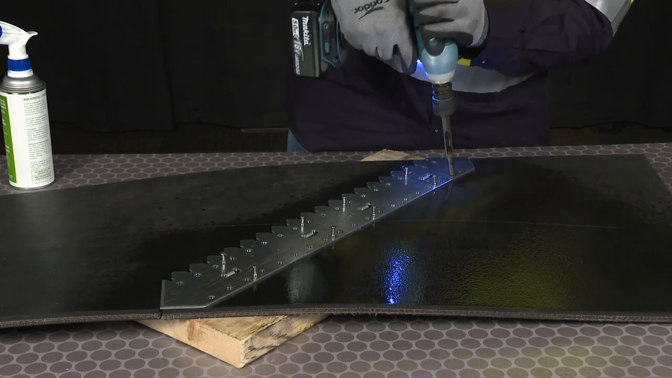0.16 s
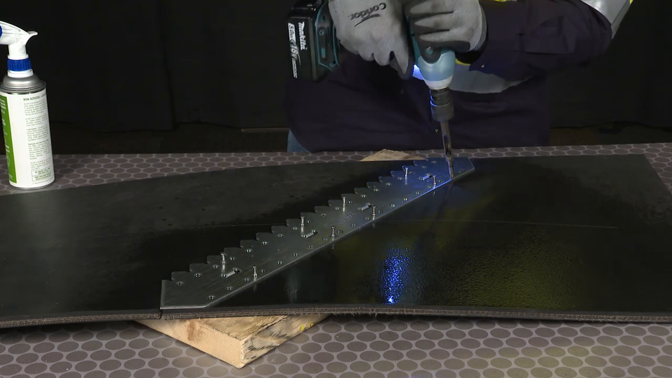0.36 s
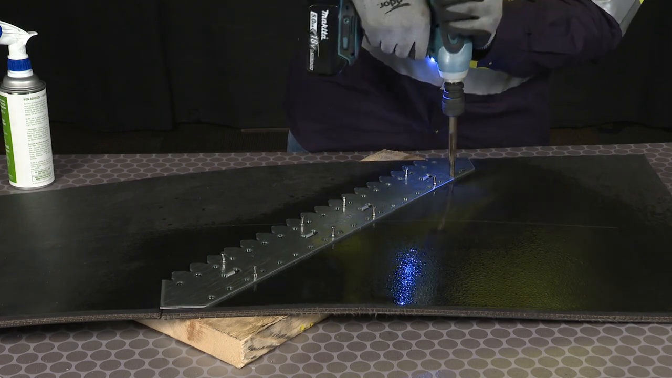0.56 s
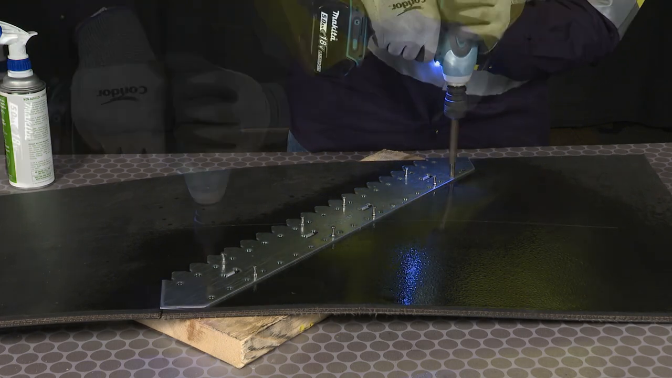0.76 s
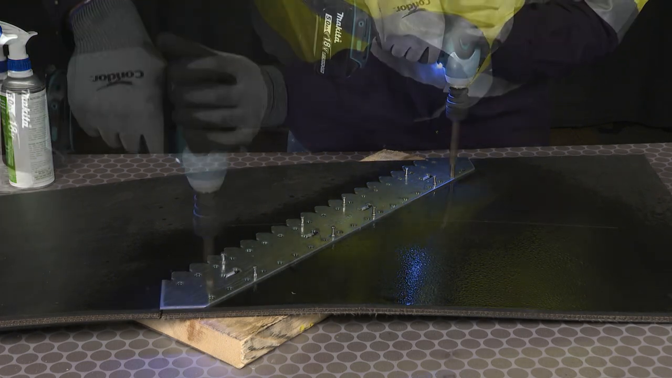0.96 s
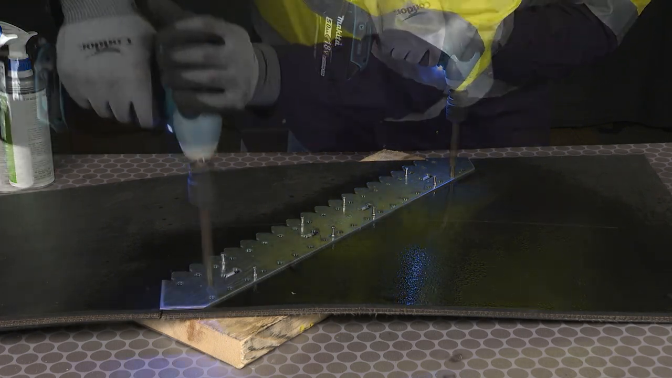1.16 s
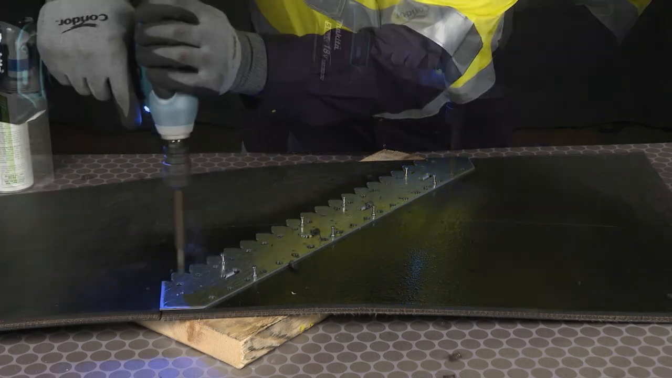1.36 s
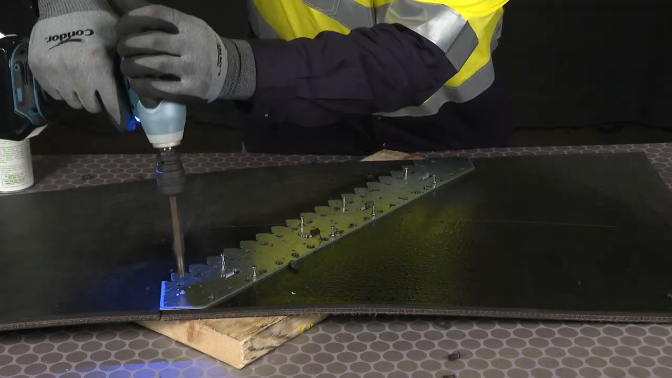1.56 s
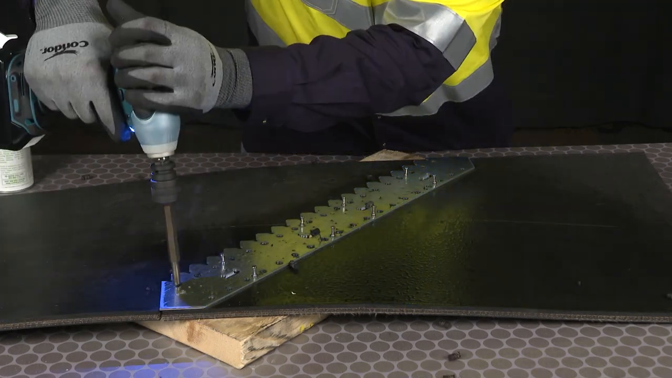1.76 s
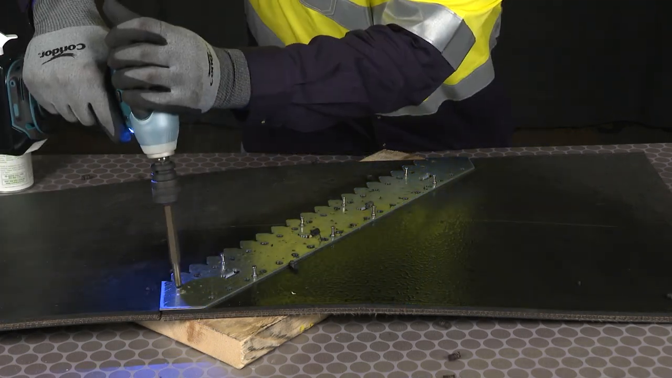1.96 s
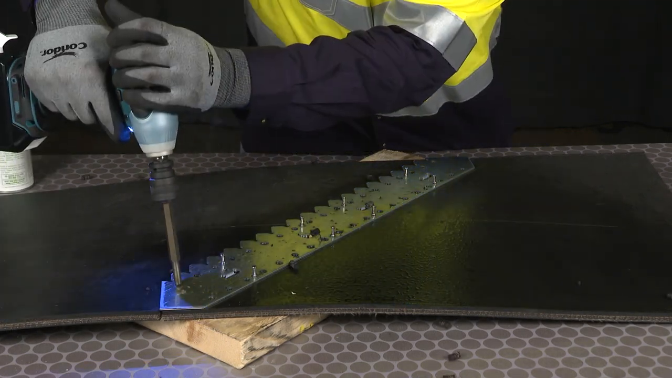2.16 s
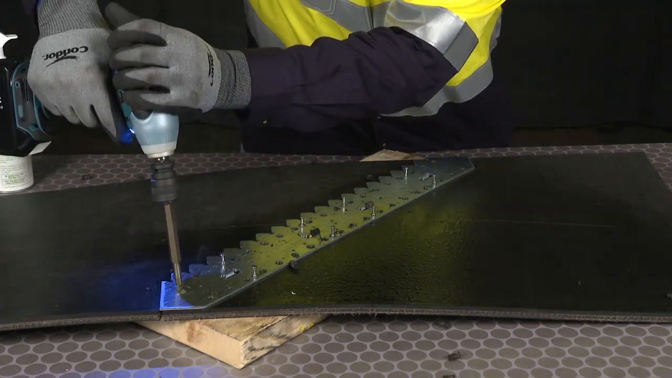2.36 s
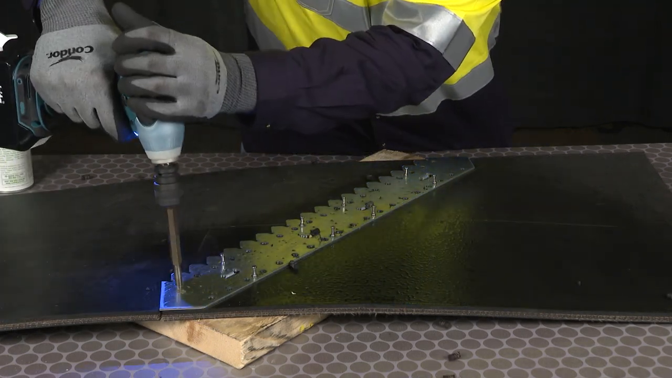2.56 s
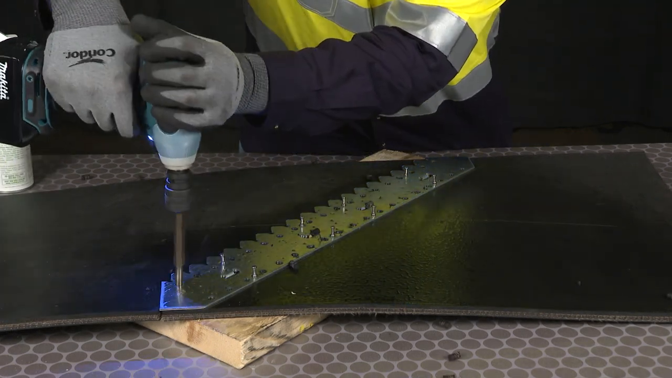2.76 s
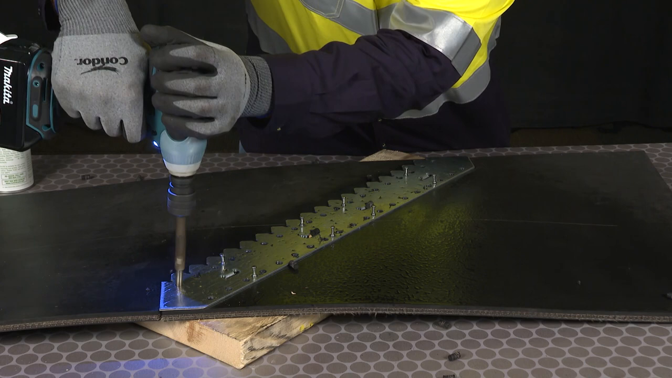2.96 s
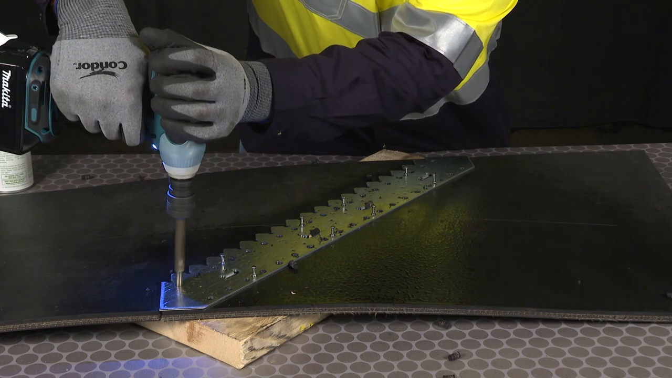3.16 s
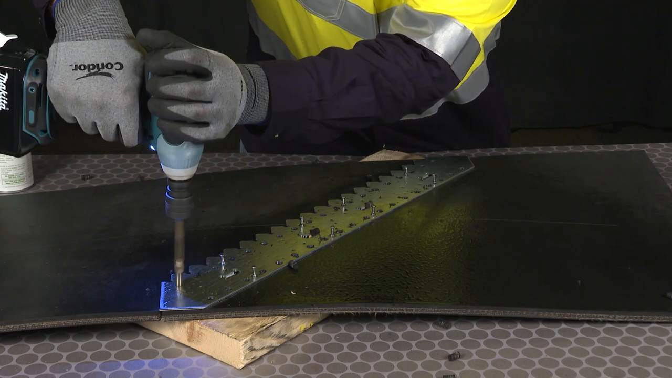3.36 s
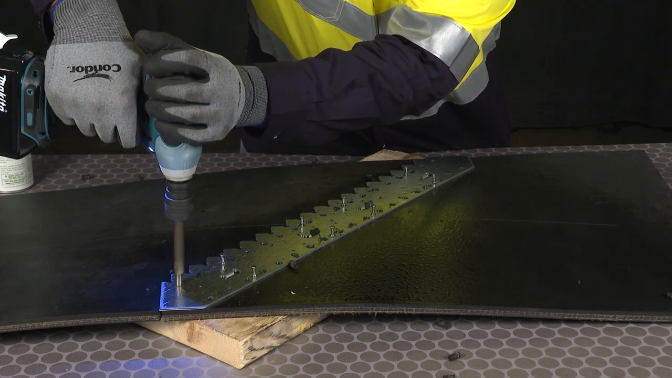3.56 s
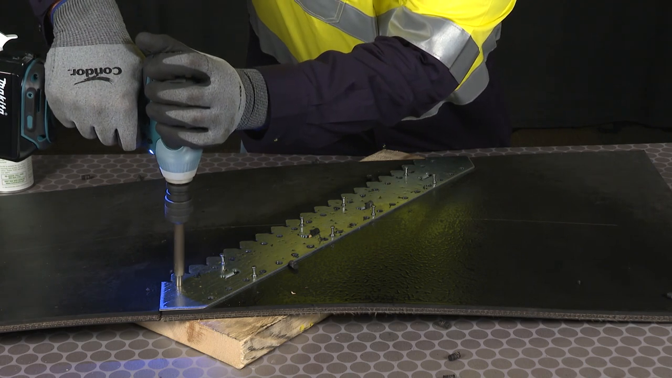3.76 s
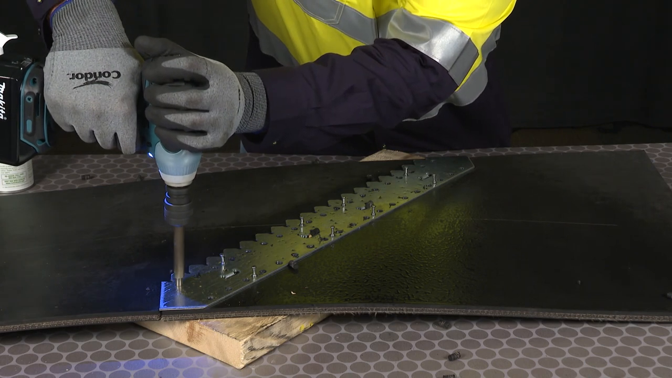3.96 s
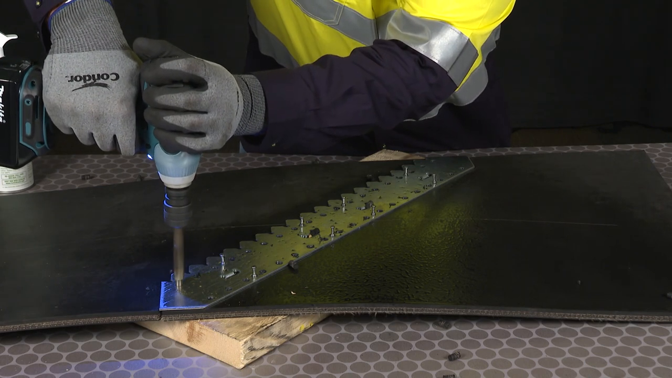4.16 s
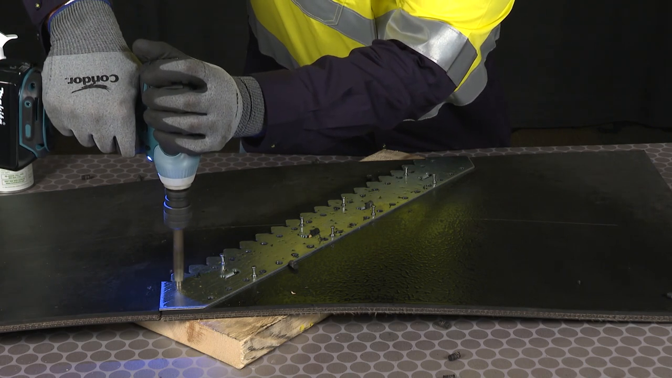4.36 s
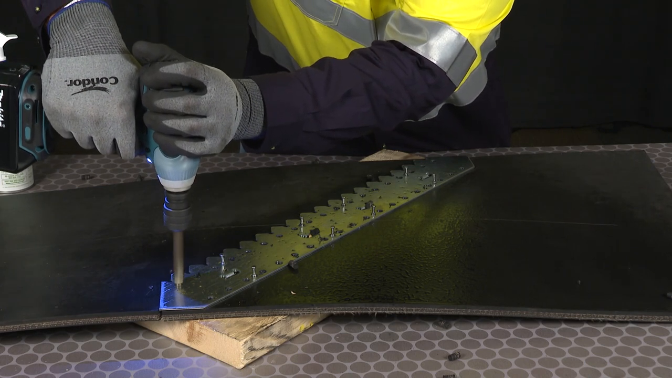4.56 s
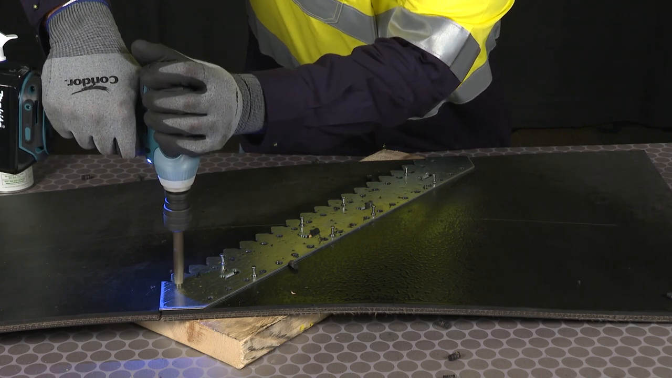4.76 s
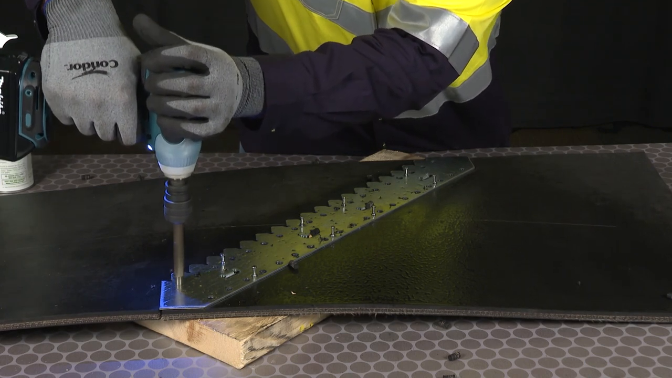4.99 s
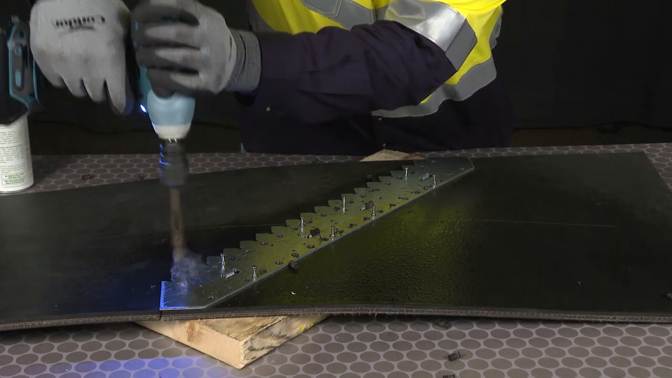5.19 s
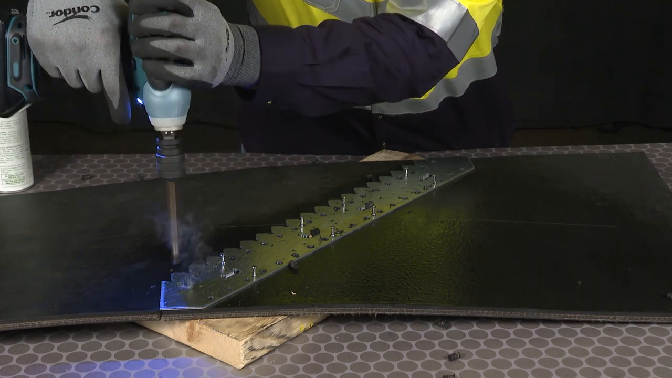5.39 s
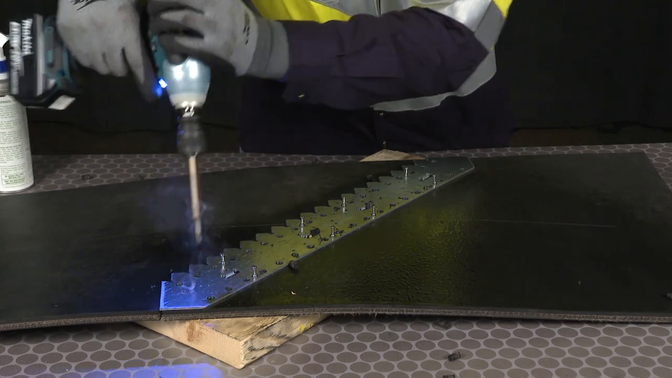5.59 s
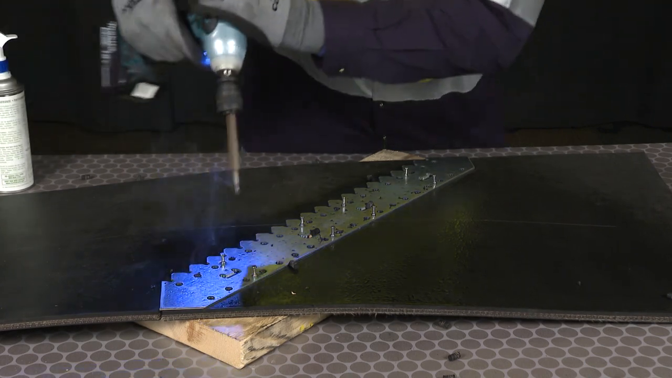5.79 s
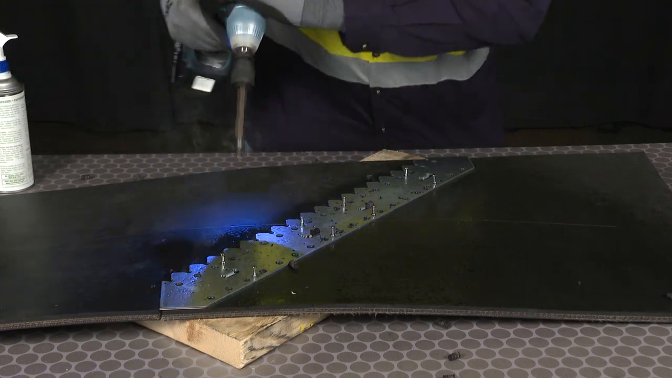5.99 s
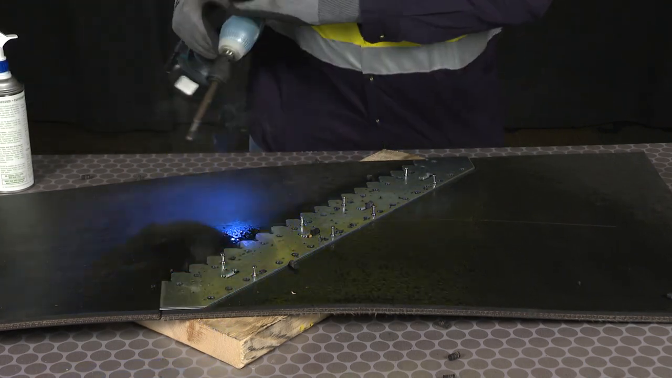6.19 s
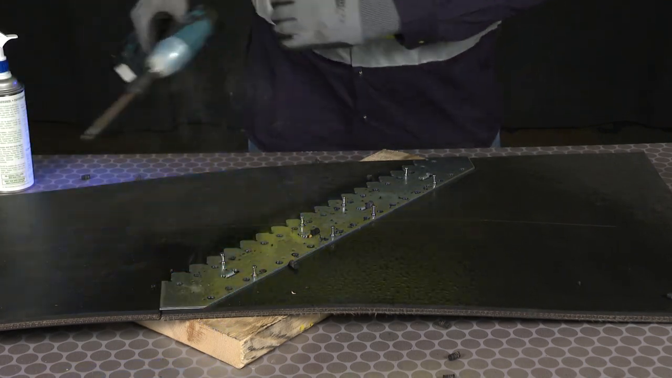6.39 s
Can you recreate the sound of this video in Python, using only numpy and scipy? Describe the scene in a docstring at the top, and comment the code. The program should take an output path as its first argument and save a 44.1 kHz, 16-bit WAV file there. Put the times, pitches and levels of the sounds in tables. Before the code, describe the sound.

A cordless impact wrench drives a punch through rubber twice, one short whirr and one longer labouring whine, with clacks, taps and ventilation rumble.

```python
"""Workshop bench: a cordless impact wrench spins a hollow punch through a rubber belt twice, without hammering.
The motor whines and blows air, its planetary gears sing and rattle, and the punch rubs over the same rubber
every turn: tones and rough tracks locked to the turning shafts, which slow under load.
Decaying noise and damped modes make the steel drive's clacks and the light taps before, between and in the cuts.
The belt thumps, braking squeaks, gloves and sleeves swish, and ventilation rumbles and hums throughout."""
import sys
import numpy as np
from scipy import signal
from scipy.fft import rfft, irfft
from scipy.io import wavfile
from scipy.ndimage import uniform_filter1d, map_coordinates

SR = 44100
rng = np.random.default_rng(int(sys.argv[2]) if len(sys.argv) > 2 else 0)


def master(y):
    """Save y as 16-bit WAV."""
    cut = np.clip(np.atleast_2d(y).T, -1, 1)
    pcm = np.round(cut * 32767)  # scale
    wavfile.write(sys.argv[1], SR, pcm.astype(np.int16))


N = 283765
T = np.arange(N) / SR


def undb(db):
    """Decibels to gain."""
    return 10 ** (np.asarray(db) / 20)


def unit(x):
    """Scale to rms 1."""
    return x / np.sqrt(np.mean(x ** 2))


def colour(x, points):
    """Filter by a (f/Hz, level/dB) spectrum, with the bass cut below its first point; rms 1."""
    hz, db = np.transpose(points)
    f = np.maximum(np.arange(N // 2 + 1) * SR / N, 1)
    bass_cut = np.minimum(f / hz[0], 1) ** 2
    gain = undb(np.interp(np.log(f), np.log(hz), db))
    return unit(irfft(rfft(x) * bass_cut * gain, N))


def noise(points):
    """Random noise with a given spectrum."""
    return colour(rng.standard_normal(N), points)


def walk(rate):
    """Smooth random wander, about rate changes a second; spread 1."""
    k = max(int(SR / rate), 1)
    steps = np.repeat(rng.standard_normal(N // k + 1), k)
    return unit(uniform_filter1d(uniform_filter1d(steps, k), k)[:N])


def fade(start, t60):
    """Exponential decay from a given moment."""
    return (T >= start) * np.exp(-np.log(1000) * np.maximum(T - start, 0) / t60)


def bump(peak, half_length):
    """A smooth swell and fall around one moment."""
    return np.exp(-((T - peak) / half_length) ** 2)


def beat(turns, place, width):
    """A smooth bump once a turn; place and width are in turns."""
    return np.exp(-(((turns - place + .5) % 1 - .5) / width) ** 2)


def track(turns, memory, bumps_db, size=2048, count=24):
    """A rough circular track read once a turn: it wears slowly and has a few high spots."""
    memory = np.clip(memory, 0, .98)
    spots = undb(bumps_db * signal.resample(rng.standard_normal(count), size))
    grain = rng.standard_normal((int(turns[-1]) + 2, size))
    # each turn remembers part of the one before
    surface = signal.lfilter([1], [1, -memory], grain, axis=0)
    return map_coordinates((surface * spots).ravel(), [turns * size], order=3)


def per_hole(first, second):
    """One value up to the second pull of the trigger and another from then on."""
    return np.where(T < HOLES[1][0], first, second)


def by_hole(first_db, second_db):
    """A gain for each hole, from decibels."""
    return per_hole(undb(first_db), undb(second_db))


# spectrum of the ventilation rumble (f/Hz, relative level/dB)
RUMBLE_SPECTRUM = [(20, -17), (50, -1), (113, -7), (142, -11), (198, -7), (230, -15), (400, -19),
                   (740, -26), (1030, -27.5), (1300, -34), (1900, -40), (4300, -44.5), (16000, -51.5)]
# steady hum in the shop (f/Hz, rms level/dB before it wavers)
HUM_TONES = [(57, -67.5), (118, -72), (199, -76.5), (1006, -84.5)]
RUMBLE_DB = -58


def shop():
    """Ventilation as low shaped noise, with a hum of sines wavering in level and phase."""
    hum = sum(undb(db + 2.3 * walk(45)) * np.sin(2 * np.pi * hz * T + 0.26 * walk(6.2))
              for hz, db in HUM_TONES)
    return undb(RUMBLE_DB) * noise(RUMBLE_SPECTRUM) + np.sqrt(2) * hum


def ringing(start, modes):
    """Damped modes set off at one moment, each slightly retuned at random."""
    t = T[:SR // 4]
    ring = 0
    for hz, t60, db in modes:
        detuned = hz * (1 + 0.013 * rng.standard_normal())
        ring = ring + undb(db) * np.exp(-np.log(1000) * t / t60) * np.sin(2 * np.pi * detuned * t)
    return np.pad(ring, (int(start * SR), N))[:N]


# spectrum of a dull knock (f/Hz, relative level/dB)
KNOCK_SPECTRUM = [(100, -36), (300, -4.5), (390, 4), (500, -0.5), (700, 1), (1300, -3), (2200, -13),
                  (4000, -28), (9000, -47.5), (16000, -50)]
# modes of the steel template on the belt (f/Hz, t60 t/s, relative level/dB)
TEMPLATE_MODES = [(637, 0.062, 0.5), (796, 0.16, -9.5), (888, .06, -6.5), (1250, 0.045, -10)]
# modes of the bench under the belt (f/Hz, t60 t/s, relative level/dB)
BENCH_MODES = [(370, 0.12, -18), (378.6, 0.13, 4), (474, .05, -13)]
# trigger, punch taps and catches
# (t/s, knock level/dB, tick level/dB, contact t/s, template ring level/dB, bench ring level/dB)
TAP_EVENTS = [(.078, -56, -88, .012, -53, -66), (.234, -52, -80, .008, -58, -58),
              (.2455, -43, -56, .0015, -37, -47), (.526, -57, -90, .004, -55, -62),
              (.598, -41, -53, .001, -52, -56), (1.792, -47, -72, .001, -54, -52),
              (1.812, -53, -47.5, .002, -63, -45), (2.088, -56, -75, .012, -62, -52),
              (2.235, -54, -82, .004, -53, -62), (2.252, -49, -61, .003, -45, -54),
              (2.423, -61, -73, .004, -66, -60), (2.527, -61, -80, .001, -64, -64),
              (2.668, -60, -86, .002, -58, -68), (2.817, -45, -54, .005, -50, -60),
              (2.873, -47, -70, .002, -34, -54), (3.036, -35, -54, .001, -37, -46),
              (3.378, -36, -54, .002, -44, -44)]
KNOCK_T60_S, TICK_T60_S = .065, .024


def handling():
    """Each contact presses in gradually: a dull noise knock, a short bright tick, ringing template and bench."""
    knock = noise(KNOCK_SPECTRUM)
    tick = noise([(1500, -16), (4500, 17.5), (8000, 12.0), (16000, -7.5)])
    taps = 0
    for s, knock_db, tick_db, contact, template_db, bench_db in TAP_EVENTS:
        press = np.clip((T - s) / contact, 0, 1)
        dull = undb(knock_db) * fade(s, KNOCK_T60_S) * knock
        bright = undb(tick_db) * fade(s, TICK_T60_S) * tick
        body = undb(template_db) * ringing(s, TEMPLATE_MODES) + undb(bench_db) * ringing(s, BENCH_MODES)
        taps = taps + press * (dull + bright + body)
    return taps


# the punch catches in the rubber and thumps the belt (peak t/s, half length t/s, f/Hz, level/dB)
BELT_THUMPS = [(0.31, 0.05, 170, -55), (0.968, 0.059, 62, -38), (1.097, 0.028, 180, -38.5),
               (3.16, .07, 64, -43.5), (3.395, 0.018, 150.4, -42)]


def thumps():
    """Short low swells of the belt flexing under the punch."""
    return sum(undb(db) * bump(s, length) * np.sin(2 * np.pi * hz * T + .5 * walk(40))
               for s, length, hz, db in BELT_THUMPS)


# grain of the motor tones
FLUTTER_DB, JITTER_RAD = 1.2, .1


def tone_at(turns, multiple):
    """A slightly grainy tone locked to the motor shaft."""
    return undb(FLUTTER_DB * walk(240)) * np.sin(2 * np.pi * multiple * turns + JITTER_RAD * walk(300))


# whine under load (multiple of motor speed, rms level/dB in the first hole, rms level/dB in the second)
CUTTING_WHINE = [(1, -62, -49.5), (3, -48, -54), (4, -60, -56), (10, -50, -54), (17, -62, -56),
                 (18, -55, -59), (19, -58, -59), (20, -55, -68), (25, -66, -70), (30, -68, -67),
                 (31, -70, -66), (40, -60, -68), (50, -61, -67), (60, -67, -67)]
# whine of the free-running motor (multiple of motor speed, rms level/dB)
FREE_RUNNING_WHINE = [(3, -52), (4, -54), (10, -52), (17, -52), (18, -58), (20, -60), (29, -64), (30, -62),
                      (39, -67), (40, -67), (50, -67)]
# spectrum of the fan air (f/Hz, relative level/dB)
AIR_SPECTRUM = [(300, -13.5), (900, 15), (2000, 1), (5000, 11.5), (5800, 11.5), (7000, 6), (8300, 5),
                (9300, 3.5), (10200, 6), (11800, 7.5), (12700, 0.5), (14500, 4.5), (16000, -4)]
# at full load the tones below this multiple fade by this much; the higher ones keep their level
BOG_ORDER, BOG_DB = 25, -15
# the whistle sings above this motor speed and fades over this range around it
WHISTLE_ORDER, WHISTLE_ABOVE_HZ, WHISTLE_FADE_HZ = 17, 262, 4
WHISTLE_FIRST_DB, WHISTLE_SECOND_DB = -62, -52.5  # rms


def motor(turns, hz, load, cutting, air):
    """Unbalance, magnet and fan-blade tones over rushing air; bogging down fades the low ones."""
    bog = undb(BOG_DB * load)
    whine = sum((bog if k < BOG_ORDER else 1) * by_hole(a, b) * undb(walk(25.07)) * tone_at(turns, k)
                for k, a, b in CUTTING_WHINE)
    free = sum(undb(db + 2 * walk(19)) * tone_at(turns, k) for k, db in FREE_RUNNING_WHINE)
    # tones fade steeply below the speed expected at this load
    pace = np.minimum(hz / np.interp(load, [0, 1], [268, 235]), 1) ** 7
    fast = (1 + np.tanh((hz - WHISTLE_ABOVE_HZ) / WHISTLE_FADE_HZ)) / 2
    whistle_level = fast * by_hole(WHISTLE_FIRST_DB, WHISTLE_SECOND_DB) * undb(walk(14))
    whistle = whistle_level * tone_at(turns, WHISTLE_ORDER)
    tones = cutting * (whine + whistle) + (1 - cutting) * free
    return np.sqrt(2) * pace * tones + undb(-1 * load) * air * noise(AIR_SPECTRUM)


def swell(turns, place, width, rest):
    """The leaning punch loads the gears once a turn, above a resting level; rms 1 over each turn."""
    power = rest ** 2 + 2 * rest * width * np.sqrt(np.pi) + width * np.sqrt(np.pi / 2)
    return (rest + beat(turns, place, width)) / np.sqrt(power)


# overtones of the tooth contact (multiple of mesh rate, relative level/dB)
TOOTH_OVERTONES = [(4, 2), (5, 0), (6, -5), (7, -6), (8, -7), (9, -11.5), (10, -12), (11, -12)]
# spectrum of the gear rattle (f/Hz, relative level/dB)
GEARBOX_SPECTRUM = [(700, 0), (1100, 5), (1650, -13.5), (2050, -7), (2450, -3), (2800, 2.5), (3300, 1),
                    (3800, -2.5), (4400, -1), (5100, -2.5), (6000, -12.5), (7200, -31.5), (10000, -63.5)]
# rough overtones of the mesh while the speed changes (multiple of mesh rate, level/dB at full surge)
WHOOP_OVERTONES = [(1, -31.5), (2, -45), (3, -48)]
SUN_TEETH, RING_TEETH = 7, 51
# once a turn the mesh tone swells, then its octave (place and width in turns)
MESH_PLACE, MESH_WIDTH, OCTAVE_PLACE, OCTAVE_WIDTH = .84, .27, .03, .17
# ragged skirt relative to the mesh tone; scraping of loaded teeth relative to the gear rattle
SKIRT_DB, SCRAPE_DB = -3.5, -10


def gears(turns, load, surge, tone, edge, rattle):
    """Planets roll over the ring teeth: a mesh tone and octave that pulse in turn, rough overtones, a rattle."""
    slop = unit(uniform_filter1d(track(turns, memory=0.78, bumps_db=-33.0), size=160))
    teeth = 2 * np.pi * RING_TEETH * turns
    # load takes up the slack and steadies the tones
    loose = 1 - .65 * load
    mesh = teeth + loose * (.25 * slop + .2 * walk(300))
    sway = .75 * np.sin(2 * np.pi * (turns - .93)) + .35 * loose * walk(220)
    pulse = swell(turns, MESH_PLACE, MESH_WIDTH, .13 + 2.2 * (1 - load) ** 1.5)
    core = np.sin(mesh + sway) * undb(2.4 * loose * walk(150))
    skirt = undb(SKIRT_DB) * loose * walk(1100) * np.sin(teeth)
    sing = pulse * (core + skirt)
    octave_pulse = swell(turns, OCTAVE_PLACE, OCTAVE_WIDTH, .2 + 3 * (1 - load) ** 1.5)
    octave = .9 * np.sin(2 * mesh + (.3 + .5 * loose) * walk(500))
    octave = octave * octave_pulse * undb(3.5 * loose * walk(400))
    # under load the teeth scrape: each overtone smears into a narrow band
    scrape = sum(undb(db) * (1.05 + .75 * walk(350)) * np.sin(k * teeth + .5 * walk(120))
                 for k, db in TOOTH_OVERTONES)
    scrape = scrape * np.sqrt(load) * rattle
    clatter = colour(track(turns, memory=0.29, bumps_db=2.0), GEARBOX_SPECTRUM)
    # spinning up or braking, the slack teeth sweep roughly through the housing resonance
    whoop = surge * sum(undb(db) * (.8 + .45 * walk(420)) * np.sin(k * mesh + .5 * walk(500))
                        for k, db in WHOOP_OVERTONES)
    return tone * sing + edge * octave + undb(SCRAPE_DB) * scrape + rattle * clatter + whoop


# colour of motor and gears at the first hole (f/Hz, level/dB)
FIRST_HOLE_COLOUR = [(850, 1), (1000, -3), (1600, -0.5), (2250, 2), (3100, -2.5), (3650, 1.5), (4200, -1),
                     (5100, -2), (5900, -5.5), (6500, -2), (7200, -1.5)]


def facing(x):
    """At the first hole the tool is turned the other way, which colours its motor and gears."""
    hz, db = np.transpose(FIRST_HOLE_COLOUR)
    gain = undb(np.interp(np.arange(N // 2 + 1) * SR / N, hz, db))
    return per_hole(irfft(rfft(x) * gain, N), x)


# spectrum of the rubbing (f/Hz, relative level/dB)
RUBBER_SPECTRUM = [(70, -22), (200, -0.5), (300, -9), (390, 4.5), (480, -0.5), (630, 1), (850, -2.5),
                   (1100, -8), (1350, -5.5), (1700, -13), (2100, -89.5), (5000, -51.5)]
# shudder (multiple of punch speed, relative level/dB in the first hole, relative level/dB in the second)
SHUDDER_ORDERS = [(2, -6, -10), (3, -7, -8), (4, -10, -8), (5, -13, -4), (8, -29, -3), (9, -15, -10),
                  (10, -20, -9), (11, -12, -10), (13, -29, -6), (22, -12, -5.5)]
# spectrum of the lurch (f/Hz, relative level/dB)
LURCH_SPECTRUM = [(115, 0), (250, -1), (600, -15)]
# once a turn the punch snags, then lurches on (place and width in turns)
SNAG_PLACE, SNAG_WIDTH, LURCH_PLACE, LURCH_WIDTH = .44, .07, .75, .05
SNAG_GAIN, LURCH_DB = .5, -7  # lurch relative to the shudder


def punch(turns, shudder, drone, rub):
    """The punch rubs one rough track, snags, lurches on and shakes the belt; six judders a turn make a drone."""
    snag = unit(1 + SNAG_GAIN * beat(turns, SNAG_PLACE, SNAG_WIDTH))
    rubbing = snag * colour(track(turns, memory=.7, bumps_db=3, count=40), RUBBER_SPECTRUM)
    shake = sum(by_hole(a, b) * undb(2 * walk(13)) * np.sin(2 * np.pi * (k * turns + rng.random()))
                for k, a, b in SHUDDER_ORDERS)
    lurch = undb(LURCH_DB) * colour(-beat(turns, LURCH_PLACE, LURCH_WIDTH), LURCH_SPECTRUM)
    judder = undb(2.4 * walk(14)) * np.sin(2 * np.pi * 6 * turns + .3 * walk(9))
    return rub * rubbing + shudder * (shake + lurch) + drone * judder


# spectrum of the unloaded gears' growl (f/Hz, relative level/dB)
BACKLASH_SPECTRUM = [(450, -48), (750, 14), (860, 2.5), (1000, 20.5), (1170, -2.5), (1400, -3.5),
                     (2200, -38.5), (2900, -34.5), (3500, -39), (8000, -8)]
GROWL_DB = -48.5  # at full spin, punch through


def growl(turns, spin, free):
    """With nothing to cut, teeth bounce in their backlash: a rough track read once a motor turn."""
    bounce = track(turns, memory=.5, bumps_db=2.5, size=128, count=6)
    return undb(GROWL_DB) * spin ** .5 * free * colour(bounce, BACKLASH_SPECTRUM)


# running speed, one list per hole: it sags as the punch sinks in and recovers as it breaks through
# (t/s, motor turn rate f/Hz)
RUNNING_SPEED = [
    [(.74, 282), (.8, 276.4), (.87, 266), (1.05, 258.4), (1.12, 252), (1.18, 281.6), (1.22, 293)],
    [(3.03, 280), (3.1, 270), (3.42, 266), (3.5, 260), (3.8, 249.4), (3.92, 243), (4.2, 240), (4.72, 233.5),
     (5.0, 255), (5.13, 262), (5.22, 292)],
]
# one row per hole (trigger t/s, spin-up t/s, easing before break-through t/s, punch through t/s, release t/s,
# then level/dB before drag and spin scale them: gear tone, tooth edge, gear rattle, shudder, drone)
HOLES = [(.595, .042, .02, 1.135, 1.26, -29.2, -37.5, -43, -37, -33),
         (2.815, .097, .38, 5.17, 5.255, -36.6, -36.7, -46, -37, -30.3)]
SPIN_UP_SHAPE, BRAKE_S, BREAK_THROUGH_S = 1.7, .06, 0.016  # the shape is an exponent


def runs():
    """The trigger spins the motor up, the punch cuts until the rubber gives way, the release brakes.

    Returns share of running speed, running speed (Hz), cutting (1, then 0 once through), giving way (0 to 1)
    and the hole's gains."""
    controls = 0
    for (trigger, spin_up, easing, through, release, *levels_db), speed in zip(HOLES, RUNNING_SPEED):
        rise = 1 - np.exp(-(np.maximum(T - trigger, 0) / spin_up) ** SPIN_UP_SHAPE)
        spin = rise * np.clip(1 - (T - release) / BRAKE_S, 0, 1)
        cutting = (1 - np.tanh((T - through) / BREAK_THROUGH_S)) / 2
        giving = np.clip(1 - (through - T) / easing, 0, 1)
        running_hz = np.interp(T, *np.transpose(speed))
        states = np.broadcast_arrays(spin, running_hz, cutting, giving, *undb(levels_db))
        controls = controls + (spin > 0) * np.array(states)
    return controls


# drag runs from 0 at the free speed to 1 when the speed is down by the full sag; teeth bear hard above the bite
FREE_HZ, SAG_HZ, BITE_DRAG = 294, 60, 0.3
# powers of the drag (tone and edge: first hole, second hole), and of the spin for loudness
TONE_POWER, EDGE_POWER = (.5, 1.45), (.25, 1.8)
SHUDDER_POWER, DRONE_POWER, SPIN_POWER = 1.7, 2.7, 0.88
# housing resonance as a motor speed; a faster sweep than this leaves it little time to ring
HOUSING_HZ, HOUSING_WIDTH_HZ, HOUSING_SWEEP_HZ_PER_S = 170, 24, 3500
# rubbing without drag in each hole, its rise to full drag, and fan air
RUB_FIRST_DB, RUB_SECOND_DB, RUB_RISE_DB, AIR_DB = -50, -48, 12, -48.5
# change in shaking and rubbing as the rubber gives way
EASE_DB, RUB_EASE_DB = -20, -7
# once through: levels of tone and edge, changes in rubbing and rattle
FREE_TONE_DB, FREE_EDGE_DB, FREE_RUB_DB, FREE_RATTLE_DB = -58, -55, -6, -2


def wrench():
    """Motor speed drives gears and, reduced, the punch; rubber drag slows the motor and makes both louder."""
    spin, running_hz, cutting, giving, tone, edge, rattle, shudder, drone = runs()
    hz = spin * running_hz
    motor_turns = np.cumsum(hz) / SR
    punch_turns = motor_turns * SUN_TEETH / (SUN_TEETH + RING_TEETH)
    drag = np.clip((FREE_HZ - running_hz) / SAG_HZ, 0, 1) * (spin > 0)
    load = np.clip((drag - BITE_DRAG) / (1 - BITE_DRAG), 0, 1)
    loud, free = spin ** SPIN_POWER, 1 - cutting

    surge = np.clip(4 * (1 - spin), 0, 1) * np.clip((hz - 120) / 40, 0, 1)
    surge = surge / np.hypot(1, (hz - HOUSING_HZ) / HOUSING_WIDTH_HZ)
    surge = surge / np.hypot(1, (np.gradient(hz) * SR / HOUSING_SWEEP_HZ_PER_S) ** 2)

    tone = spin ** 2 * (cutting * tone * drag ** per_hole(*TONE_POWER) + free * undb(FREE_TONE_DB))
    edge = spin ** 2 * (cutting * edge * drag ** per_hole(*EDGE_POWER) + free * undb(FREE_EDGE_DB))
    rattle = loud * rattle * undb(FREE_RATTLE_DB * free)
    contact = loud * undb(EASE_DB * giving)
    shudder = contact * cutting * shudder * drag ** SHUDDER_POWER
    drone = contact * cutting * drone * drag ** DRONE_POWER
    rub_change_db = RUB_RISE_DB * drag + RUB_EASE_DB * giving + FREE_RUB_DB * free
    rub = loud * by_hole(RUB_FIRST_DB, RUB_SECOND_DB) * undb(rub_change_db)

    drive = motor(motor_turns, hz, load, cutting, loud * undb(AIR_DB))
    drive = drive + gears(punch_turns, load, surge, tone, edge, rattle)
    return facing(drive) + growl(motor_turns, spin, free) + punch(punch_turns, shudder, drone, rub)


# spectrum of the crack (f/Hz, relative level/dB)
CRACK_SPECTRUM = [(120, -67), (380, 8), (550, 1.5), (750, 4.5), (1200, -1.5), (1900, -4.5), (2600, -6),
                  (3500, -3), (5000, -17), (7000, -18), (11000, -21.5), (16000, -19)]
# resonances of the steel drive (f/Hz, width f/Hz, relative level/dB)
STEEL_MODES = [(940, 130, 3), (1208, 170, -1), (2400, 300, -8.5), (4000, 970, -8.5), (5000, 1400, -8.5),
               (8300, 3000, -11), (11170, 700, -7), (11800, 230, -19), (14400, 190, 0)]
# clacks of the drive (t/s, blow level/dB, ring level/dB, blow t60 t/s)
DRIVE_CLACKS = [(0.631, -23.5, -55, 0.074), (1.307, -34.5, -31, 0.042), (1.36, -58, -53, 0.042),
                (2.869, -24, -36, 0.017), (4.94, -65, -39, .02), (4.973, -63, -41, .02),
                (5.006, -65, -44, .02), (5.302, -35.5, -31, 0.05), (5.392, -75, -50.5, .05)]


def clacks():
    """Hammer meets anvil, mostly at starts and stops: a noise crack, and loose steel chatters in its resonances."""
    crack, chatter = noise(CRACK_SPECTRUM), rng.standard_normal(N)
    ring = unit(sum(undb(db) * signal.lfilter(*signal.iirpeak(hz, hz / width, SR), chatter)
                    for hz, width, db in STEEL_MODES))
    return sum(undb(blow_db) * fade(s, t60) * crack + undb(ring_db) * fade(s, t60=0.052) * ring
               for s, blow_db, ring_db, t60 in DRIVE_CLACKS)


# the brake bites with a short squeak (peak t/s, level/dB)
BRAKE_SQUEAKS = [(1.27, -45), (5.268, -43.5)]
# spectrum of the squeak (f/Hz, relative level/dB)
SQUEAK_SPECTRUM = [(1800, -8), (2300, 1), (3000, 3), (9800, -8), (11100, 3), (12500, -18), (13800, -1),
                   (15000, -18)]
SQUEAK_S = 0.01  # half length


def squeaks():
    """A thin burst of bright noise just after the trigger is let go."""
    return noise(SQUEAK_SPECTRUM) * sum(undb(db) * bump(s, SQUEAK_S) for s, db in BRAKE_SQUEAKS)


# gloves and sleeves as the grip is set and the tool is lifted away (peak t/s, half length t/s, level/dB)
CLOTH_SWISHES = [(2.64, 0.13, -78.5), (5.76, 0.41, -77.5), (6.332, 0.2, -68)]
# spectrum of the cloth (f/Hz, relative level/dB)
CLOTH_SPECTRUM = [(500, -4.5), (1500, -3), (3000, -5), (5000, -6), (7000, -12), (10000, -14), (16000, -23)]


def swish():
    """Gloves and sleeves rub: soft swells of flickering noise."""
    swells = sum(undb(db) * bump(s, length) for s, length, db in CLOTH_SWISHES)
    return swells * undb(walk(30)) * noise(CLOTH_SPECTRUM)


ROOM_T60_S, ROOM_DB = 0.39, -19.5


def room(x):
    """A short diffuse tail from the workshop walls, duller than the direct sound."""
    t = T[:SR // 2]
    tail = rng.standard_normal(len(t)) * np.exp(-np.log(1000) * t / ROOM_T60_S) * (t > .006)
    tail = signal.sosfilt(signal.butter(1, 6000, fs=SR, output="sos"), tail)
    return x + undb(ROOM_DB) * signal.fftconvolve(x, tail / np.linalg.norm(tail))[:N]


def scene():
    """Tool and handling ring in the room over the shop's own rumble, one channel."""
    tool = wrench() + clacks() + squeaks() + thumps()
    return (room(tool + handling() + swish()) + shop())[None]


TOP_HZ = 15900


def record(dry):
    """A steep low-pass cuts the top."""
    return signal.sosfilt(signal.ellip(10, .2, 70, TOP_HZ, fs=SR, output="sos"), dry)


dry = scene()
out = record(dry)
master(out)
```